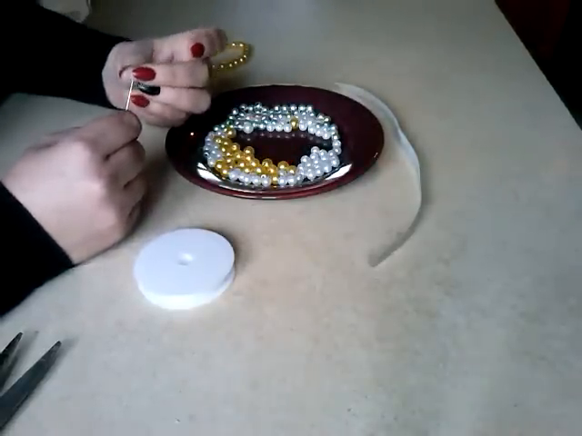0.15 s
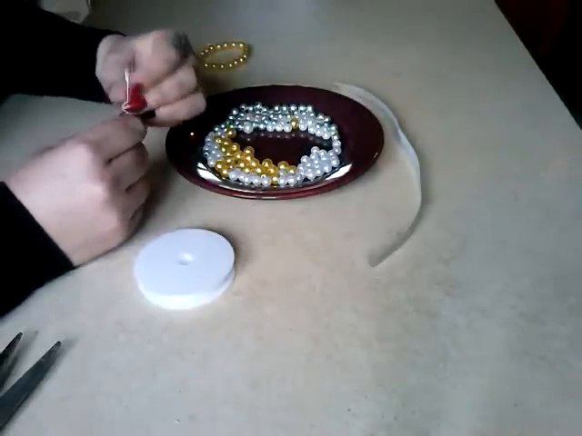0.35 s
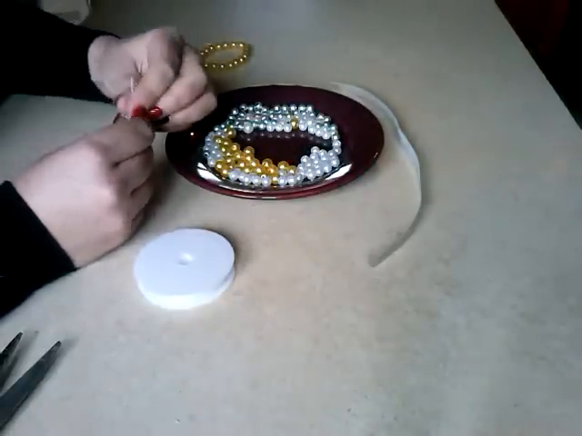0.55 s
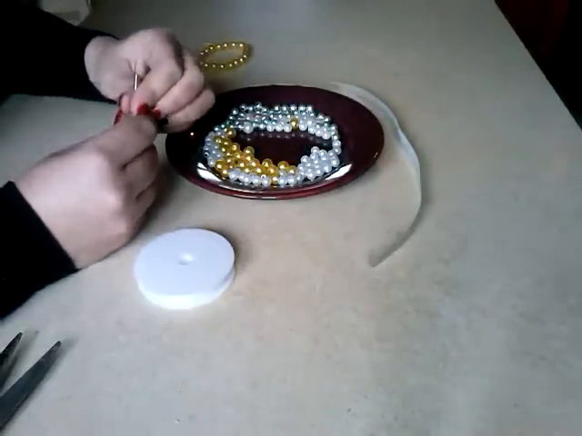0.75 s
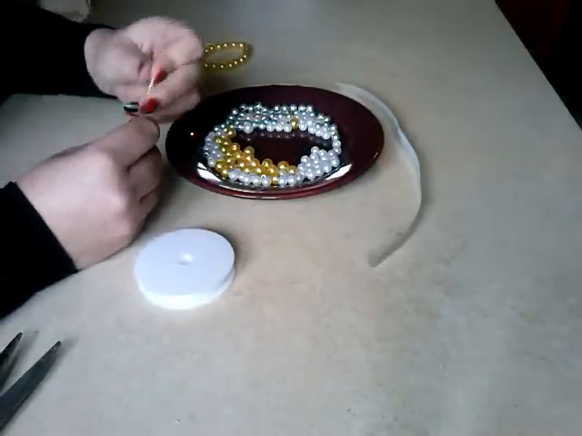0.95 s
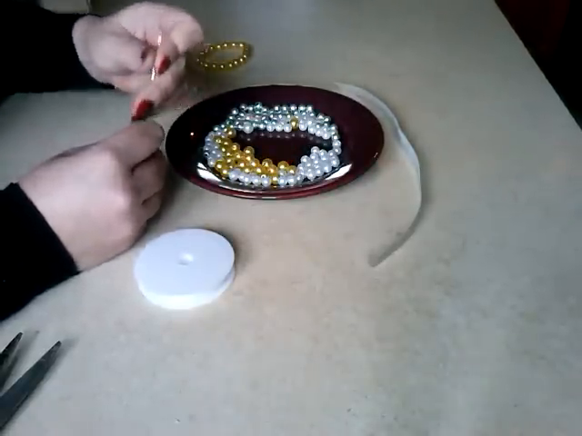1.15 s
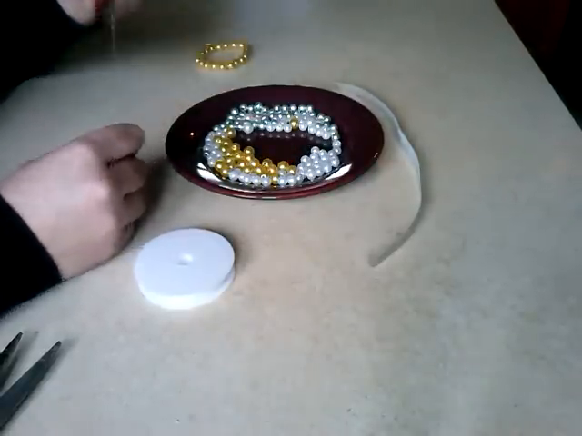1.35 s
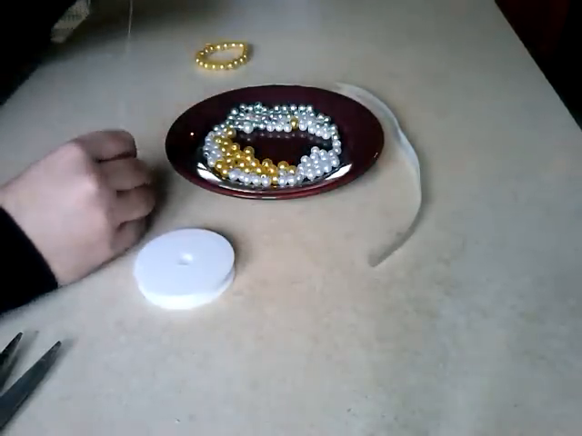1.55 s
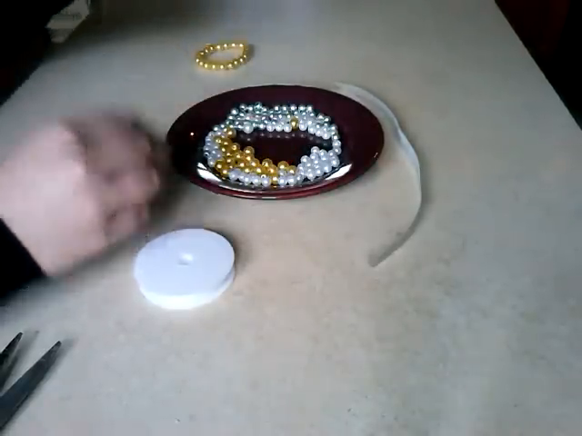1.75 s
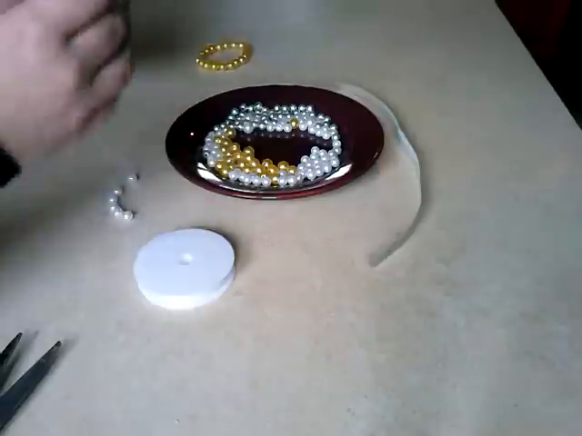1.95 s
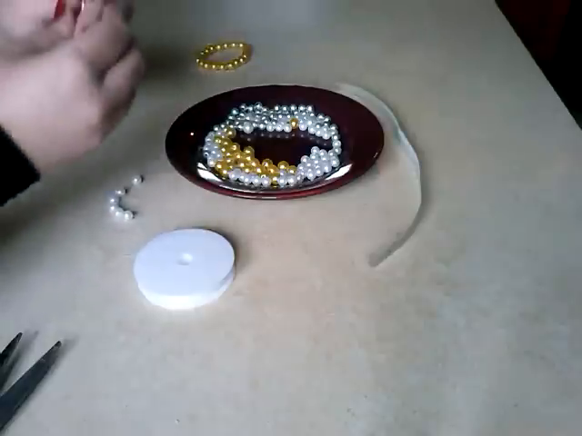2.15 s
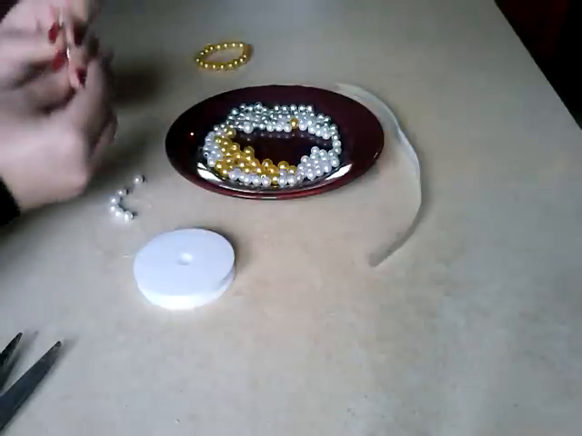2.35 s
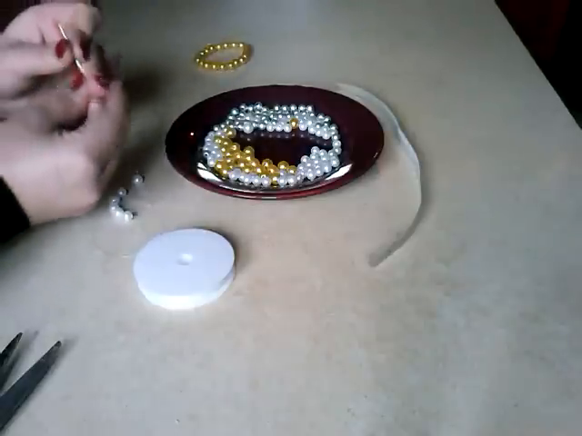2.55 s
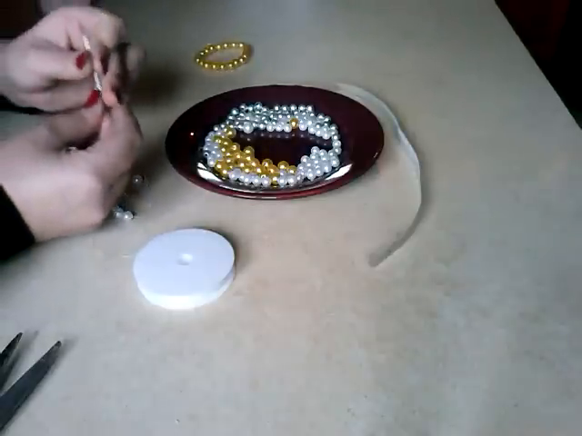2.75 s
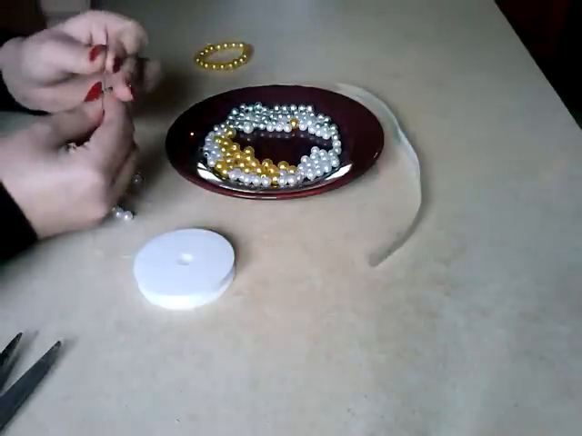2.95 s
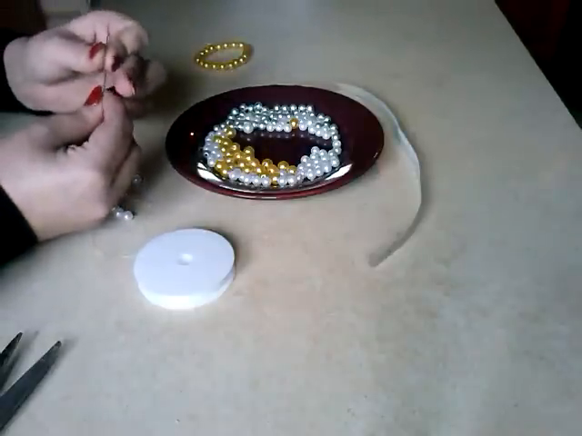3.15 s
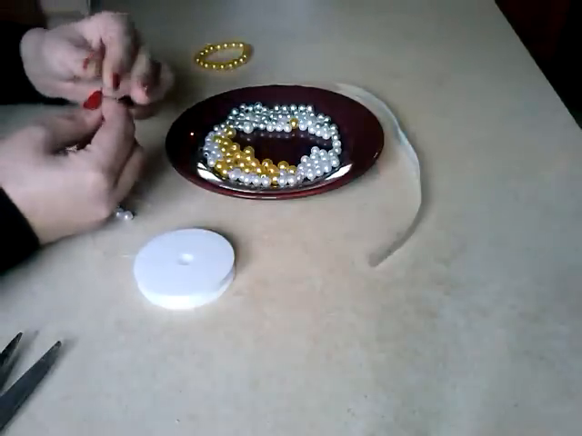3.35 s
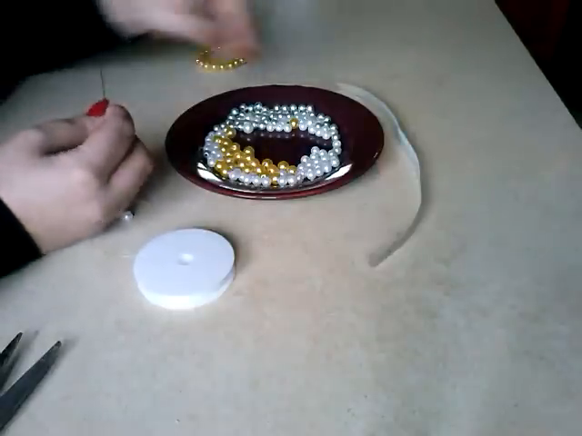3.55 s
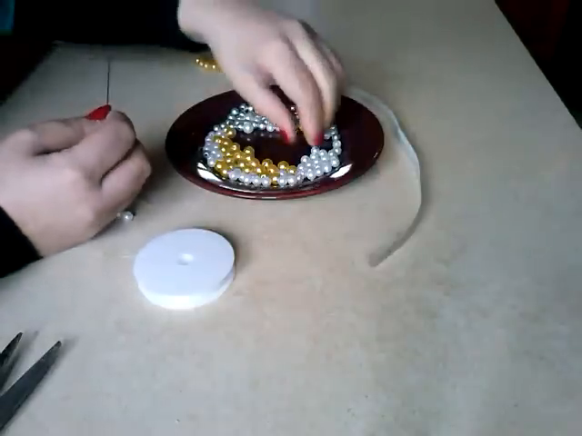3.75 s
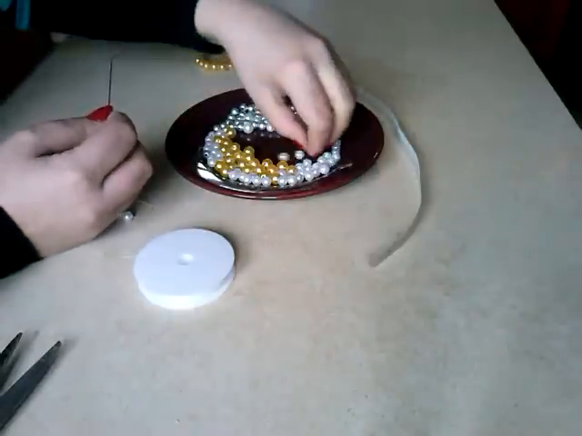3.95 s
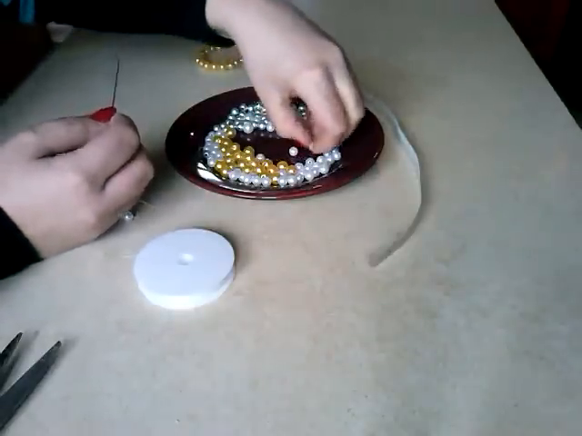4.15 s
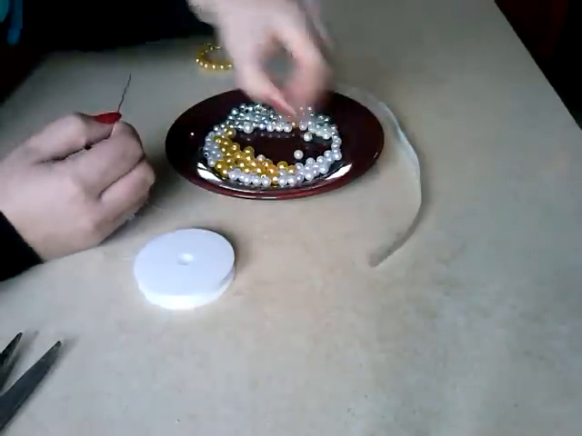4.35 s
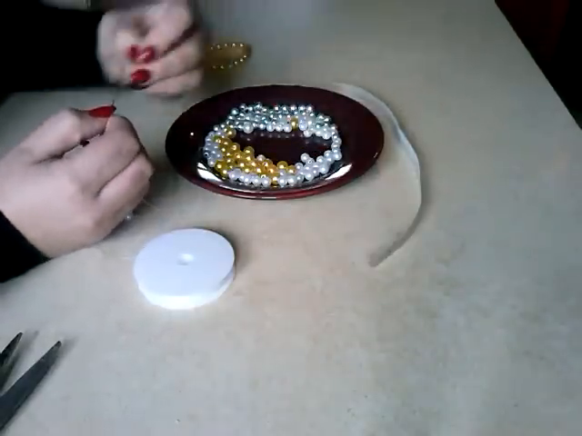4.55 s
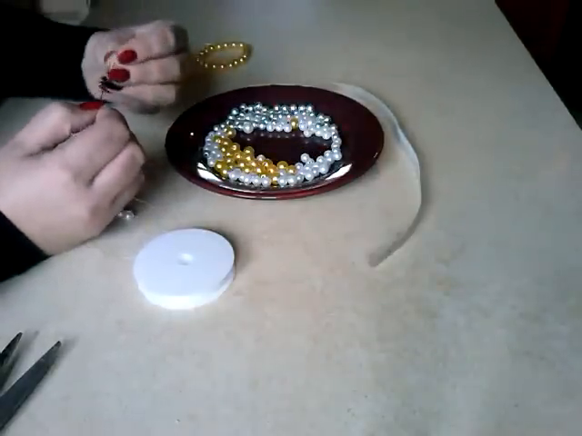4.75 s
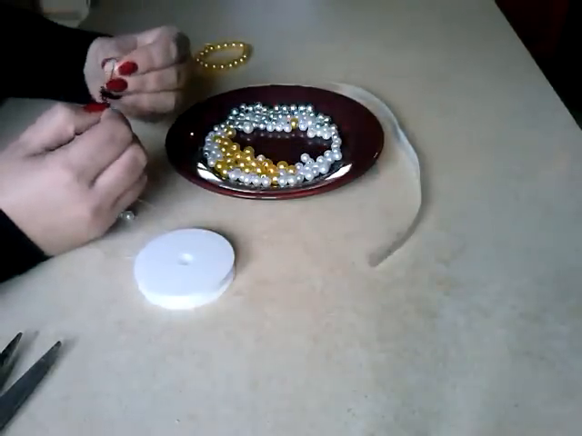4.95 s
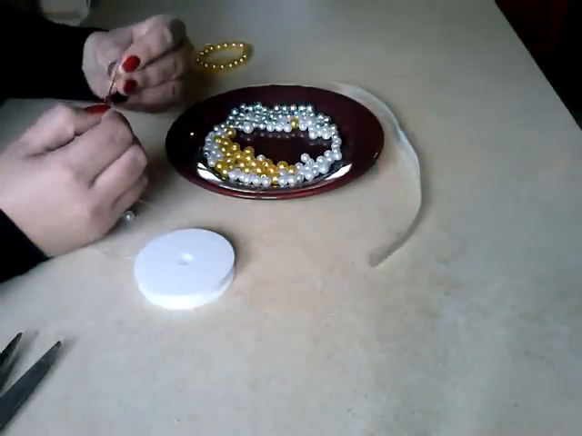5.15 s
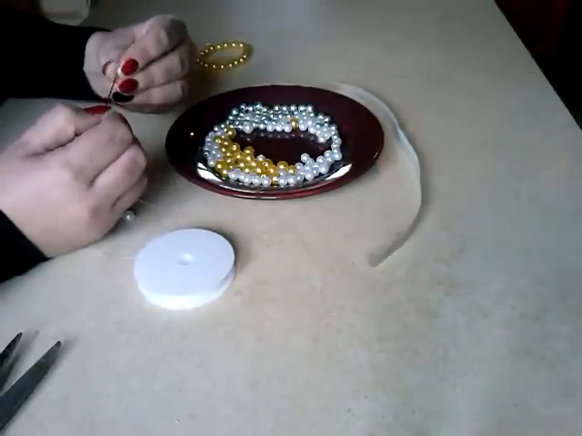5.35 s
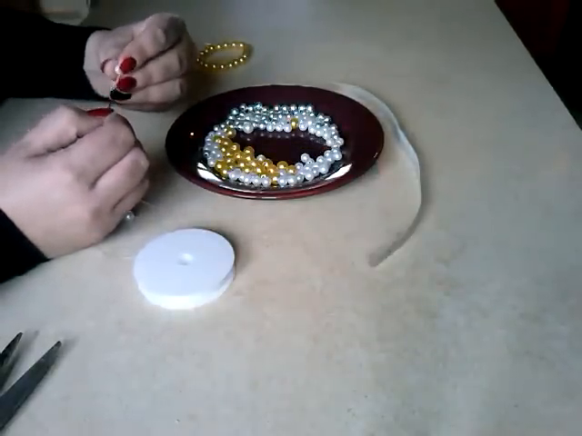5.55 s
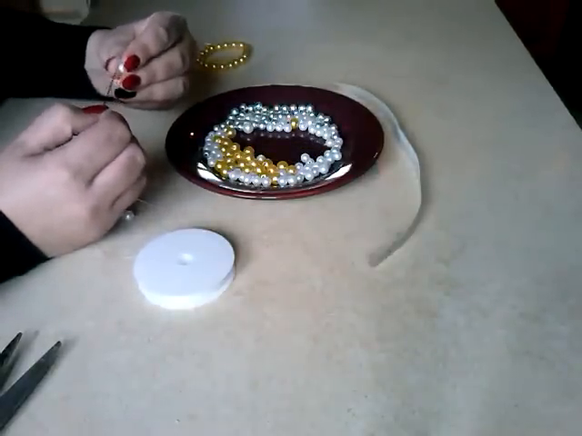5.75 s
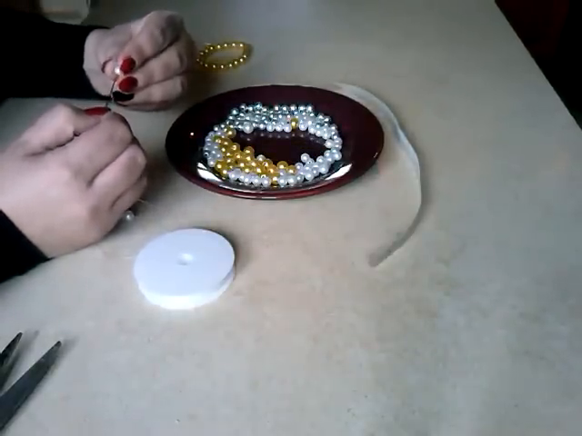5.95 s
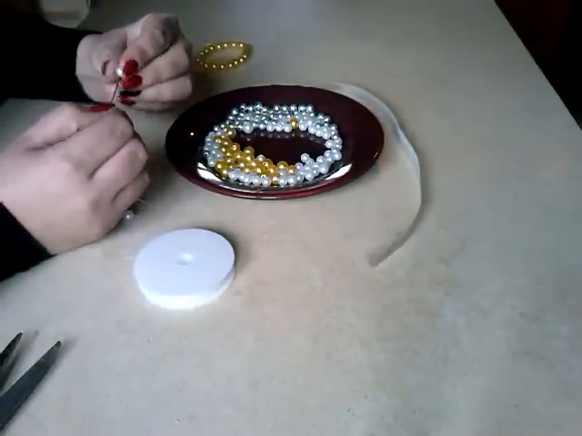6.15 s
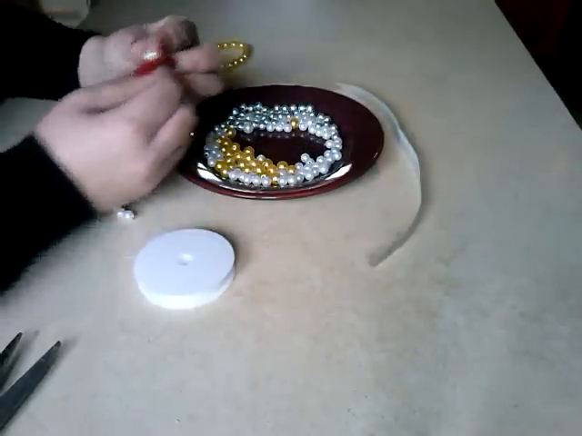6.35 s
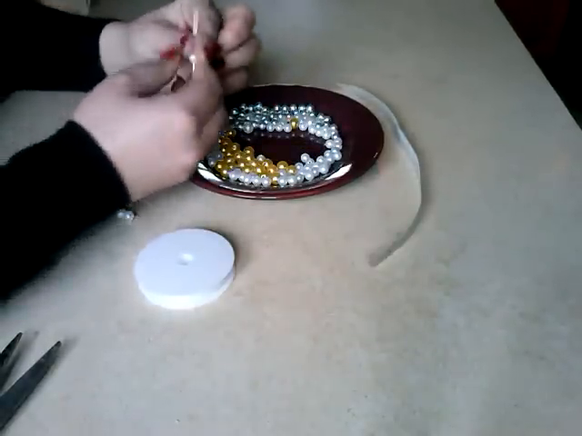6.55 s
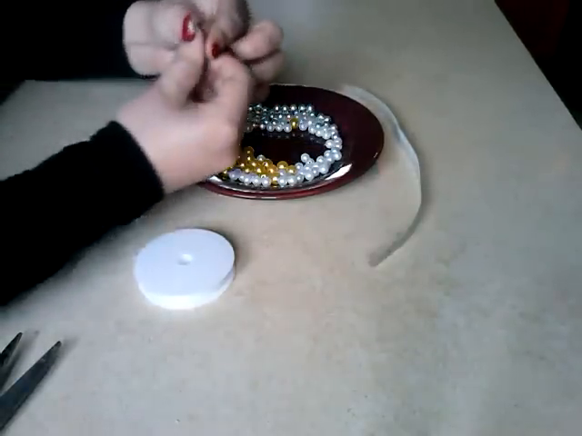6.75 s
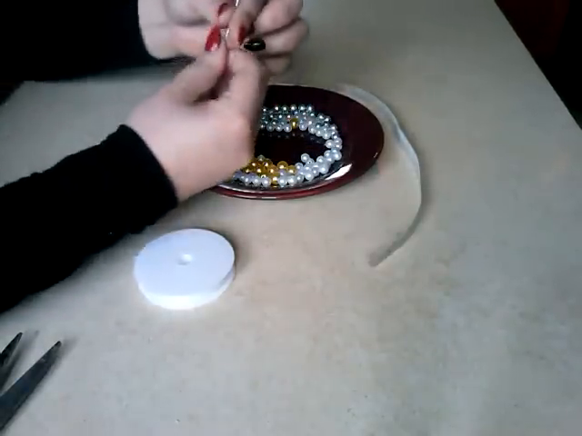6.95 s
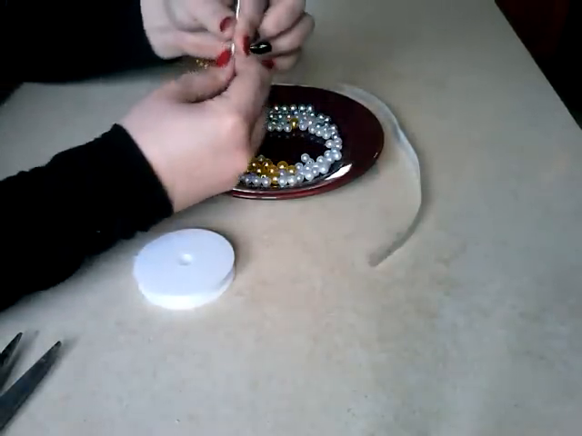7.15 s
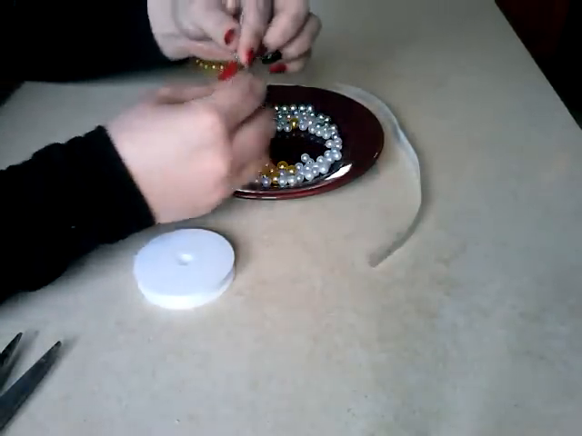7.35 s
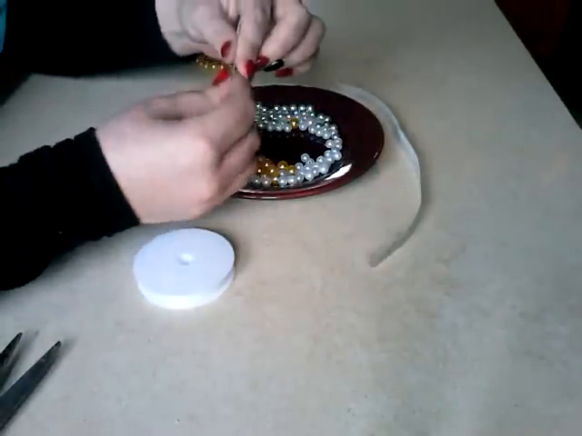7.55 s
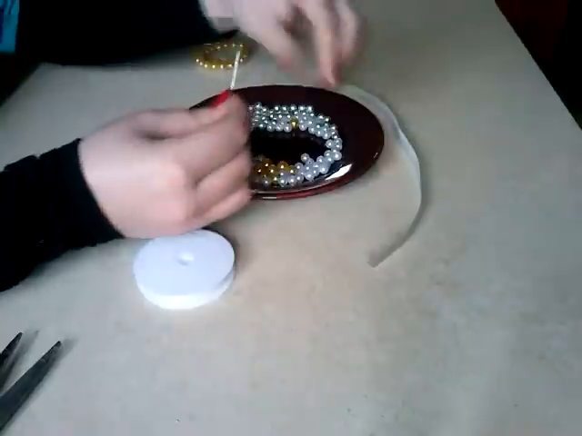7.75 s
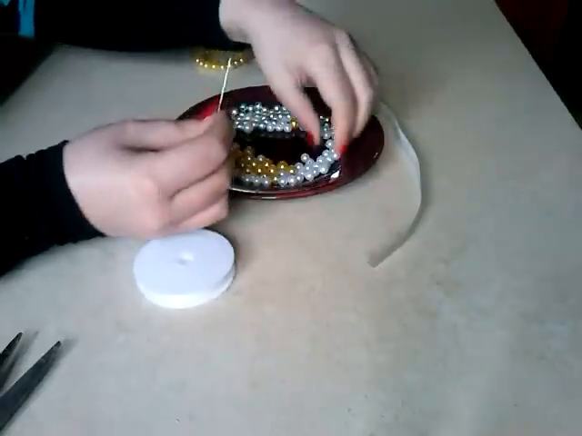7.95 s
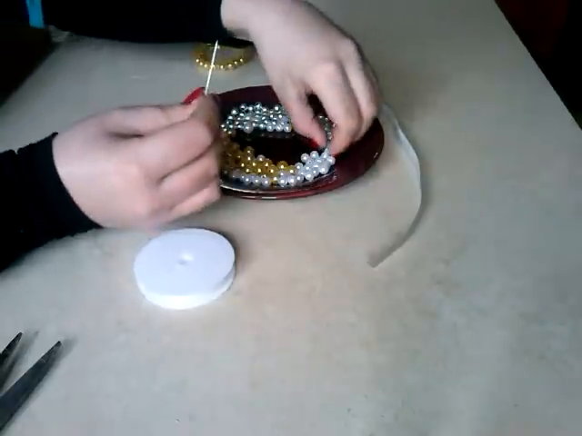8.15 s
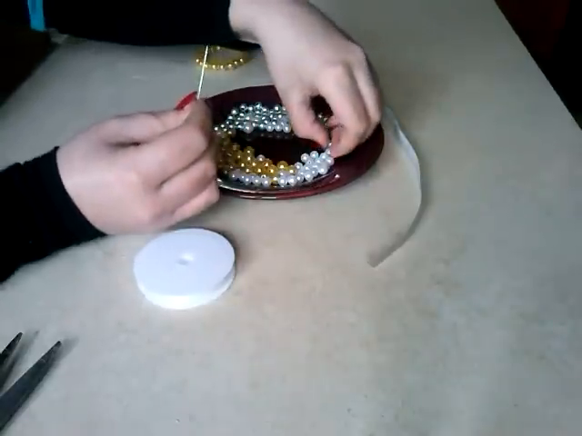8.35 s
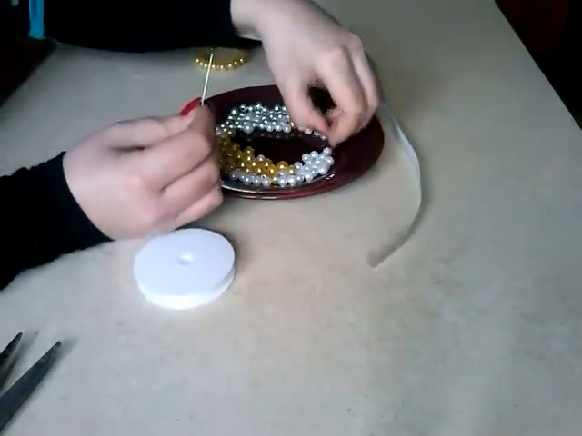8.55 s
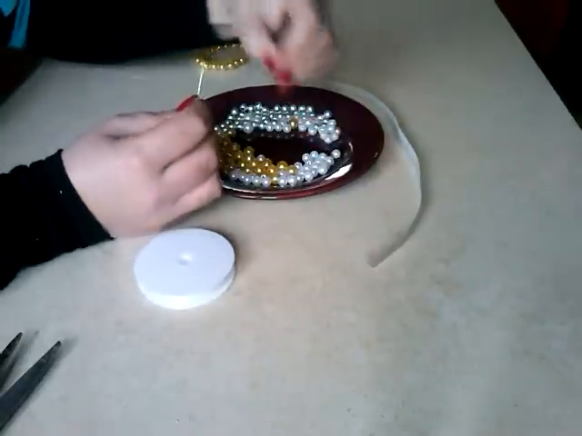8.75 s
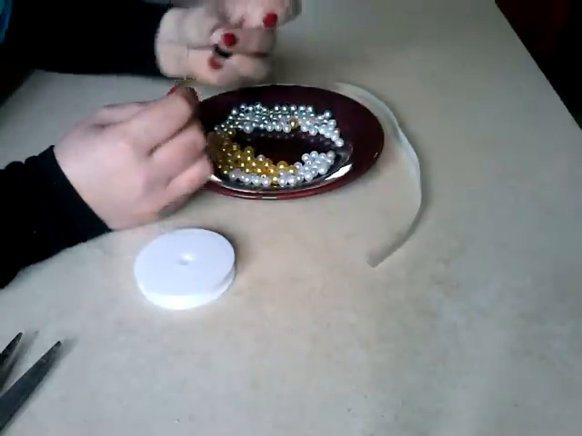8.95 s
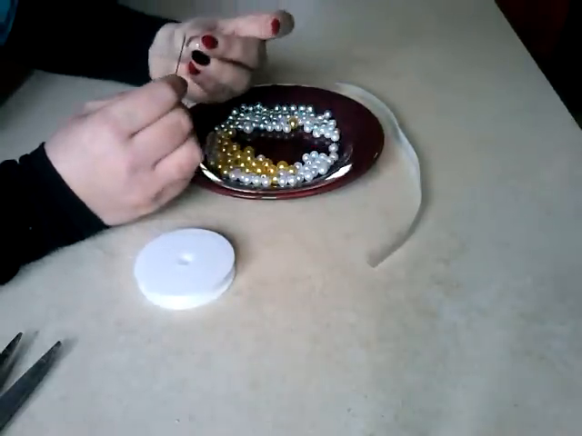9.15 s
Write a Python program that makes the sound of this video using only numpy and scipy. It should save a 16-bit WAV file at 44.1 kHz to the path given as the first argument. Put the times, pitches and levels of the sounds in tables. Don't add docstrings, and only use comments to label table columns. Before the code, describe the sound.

Tiny hard beads handled at a table, picked up by a close, slightly hissy microphone in a reflective room. Distant ticking runs throughout. First come sharp clicks and a grainy string drag, then gentle rattling as beads are pushed in a plate with short ceramic ringing. Later a loud clink on the plate rim breaks the calm, with smaller rebounds, then sharp table bounces growing closer and softer, knuckle knocks and faint rattling.

```python
import sys
import numpy as np
from scipy import signal
from scipy.fft import rfft, irfft, next_fast_len
from scipy.io import wavfile

SR = 44100
rng = np.random.default_rng(int(sys.argv[2]) if len(sys.argv) > 2 else 0)


def transcribe(signal):
    frames = np.atleast_2d(signal).T
    limited = np.clip(frames, -1, 1)
    pcm = np.round(limited * 32767).astype(np.int16)
    wavfile.write(sys.argv[1], SR, pcm)


def voltage_ratio(level):
    return 10 ** (np.asarray(level, float) / 20)


N = 406161

# f/Hz, density/dB per Hz
HISS = [(71, -49.5), (120, -10.5), (166, -11), (192, -8), (294, -5.5), (407, -9), (433, -23), (470, -9.5),
        (1100, -9.5), (1300, -14), (15600, -13.5)]
HISS_DB, RUMBLE_DB = -61, -76.5
# f/Hz, level/dB rms
HUM = [(48.4, -72), (96.9, -72.5), (209.9, -83.5), (441.4, -79), (1082, -86), (1771, -87), (2579, -85.5)]

# t after the tick/s, level/dB
TICK_PARTS = [
    (-.025, -1.5),
    (-.006, -1.5),
    (.008, -5),
    (.03, -20.5),
    (0.057, -8),
]
TICK_EXTRA_DB = [-4, -2.7, 2.5, 0, 2, -1, -2.5, -4, -13, -3.3]
# f/Hz, width/Hz (unused), level/dB
CLOCK_CASE = [(1360, 29, -7), (2740, 9.3, -6), (3920, 14, -2), (5070, 140, -3.5), (5830, 15, -6),
              (7100, 33, -14), (10800, 96, -3)]
FIRST_TICK_S, TICK_DB = 0.019, -53.5

# f/Hz, width/Hz, level/dB
TABLE_MODES = [(828, 54, -0.5), (1026, 34, -3.5), (1300, 27, -14.5), (1800, 66, 4.5), (2530, 120, 6)]
# t/s, peak/dB, ping/Hz
TAPS = [(1.4066, -15, 11800), (1.7499, -22.5, 11600), (1.7577, -20, 11400), (1.7627, -18, 11800),
        (1.4166, -24, 12200), (1.591, -33, 10900), (1.7601, -26, 12000), (1.7677, -24, 12500),
        (1.7728, -22, 12000), (6.3138, -42, 12100), (7.496, -37, 10800), (9.0724, -42, 9600)]
# t/s, peak/dB, ping/Hz
BOUNCES = [
    (7.9969, -13.5, 11200),
    (8.112, -18.5, 10800),
    (8.1771, -18, 11900),
    (8.1885, -21.5, 9700),
    (8.2323, -21.5, 12000),
    (8.2734, -23, 12100),
    (8.304, -29, 10800),
    (8.3332, -30.5, 12000),
    (8.355, -34, 11900),
]
# t/s, peak/dB, ping/Hz
TINKS = [(0.8648, -47, 11900), (0.8867, -41, 12700), (1.1767, -46, 10500), (1.215, -44, 13100),
         (1.34, -33, 12300), (1.8134, -35, 11600), (1.8422, -65, 10300), (2.406, -37.5, 10800),
         (4.1764, -45, 12300), (7.964, -26, 13900), (8.065, -33, 11600)]
# t/s, peak/dB, ping/Hz
TOCKS = [
    (1.5438, -49, 6400),
    (1.6594, -36.5, 5500),
    (1.885, -28, 6670),
    (2.3181, -38, 6260),
    (2.393, -40, 7300),
    (2.603, -40.5, 6000),
    (7.0765, -43.5, 5630),
    (8.3746, -35, 6870),
]
# body/dB, table knock/dB
CLICK_KINDS = [
    (-1.5, -28.5),
    (-3.5, -30.5),
    (-8.5, -38),
    (0, -24.5),
]
PING_PEAK_CYCLES = 0.8
# t/s, length/s, level/dB, sag/dB per s
DRAGS = [
    (1.01, 0.018, -63, 5),
    (1.176, .15, -68, 3),
    (1.53, 0.066, -47, 121),
    (1.664, 0.006, -51, 100),
    (1.78, 0.2, -43.5, 37),
    (8.19, 0.24, -50.5, 57),
    (2.6, 0.0067, -60, 5),
    (6.31, 0.13, -60.5, 100),
    (6.6, 0.42, -64, 44),
]
# f/Hz, density/dB per Hz
DRAG_COLOUR = [(300, 3), (1040, 3), (2000, 2), (5000, -3.5), (11000, -1), (16000, -16)]
DRAG_KNOCK_DB = -25.5
# delay/s, share
MIRROR = [(.00032, -.6), (.00067, .4), (.00115, -.3)]

# t/s, length/s, level/dB, sag/dB per s
THUDS = [
    (1.77, 0.24, -65, 83),
    (3.89, .2, -50, 90),
    (7.95, 0.17, -58, 82),
    (8.19, 0.016, -64, 50),
]
# t/s, length/s, level/dB, sag/dB per s
RUMBLES = [
    (1.75, .25, -64, 82),
    (3.826, .42, -53, 33),
    (4.3, .03, -65, 370),
    (4.34, 0.26, -60, 8.1),
    (8.0, 0.22, -49.5, 96),
    (8.24, .2, -59.5, 79),
    (8.5, 0.34, -59, 80),
]
# t/s, peak/dB, f/Hz
BUMPS = [
    (2.268, -54, 342),
    (2.502, -44, 470),
    (3.373, -54, 433),
    (7.934, -35, 976),
    (8.02, -35.5, 984),
    (8.604, -45, 970),
    (8.925, -54, 310),
]
# t/s, peak/dB, rise/s
PUSH = (7.5748, -17, 0.00028)
RISE_DB_PER_S, RELEASE_DB_PER_S = 590, 318

# t/s, length/s, level/dB, sag/dB per s
SCUFFS = [
    (2.265, 0.008, -68.5, 53),
    (4.61, 0.051, -62, 27),
    (6.54, 0.047, -62.5, 24),
]
SCUFF_HZ, SCUFF_WIDTH_HZ = 1770, 510

# rim/dB, well/dB, under the fingers/dB, far side/dB
PLATE_DB = [(-15, -21, -8.5, -13), (-20.5, -7, -17, -30.5), (-19.5, -22, -11, -28), (-25, -26, -4, -45),
            (-24, -9.5, 1.5, -15), (-6, -15.5, -5, -24), (-14.5, -12, -0.5, -10), (-32.5, -7, 5, -7),
            (-4.5, -4.5, -20, -14), (-15.5, -1, 0.5, -13), (-10.5, -23, -51, -12), (-15, -13, 1, -4),
            (-16.5, -1, 0, -22), (-17, -2.5, -11, -1.5), (-10.5, -22, -2, -17), (-33, -1, -25, -19),
            (-13.5, -28, 6, 1.5), (-41, -30, -14, -22), (-5, 1, -7, -17), (-28.5, -24, 1, -2),
            (-19.5, -2, 5, -31), (-41, -10, -5, -22), (-11.5, -21, 1, -10), (-24, -2, 3, -16),
            (-1, -41, -21, -20), (-15, -33, -15, -32), (-34, -3, -9, -38), (-10, -11, 2, -8),
            (-36, -17, -39, -31), (-12.5, 2, -38, -42)]
PLATE_HZ = [1735, 2260, 2822, 3420, 3590, 4066, 4885, 5440, 5522, 6422, 7082, 7890, 8525, 8710, 8803]
PLATE_HZ_TOP = [9890, 10000, 10470, 10640, 10780, 11150, 11640, 11849, 12030, 12570, 12645, 13630, 13790,
                14420, 14765]
DAMPING = [0.51, 0.31, 0.47, 0.32]
FOOT_DB = [-28, -28, -15, -18.5]
# f/Hz, level/dB, t60/s
FOOT_ROCK = [(656, -31.5, 0.096), (866, -35, 0.18), (980, -28, 0.041)]
# t/s, peak/dB
RIM_BLOWS = [
    (7.5745, 0),
    (7.6916, -13),
    (7.7502, -20.5),
    (7.7734, -18),
    (7.7912, -26),
    (7.8081, -29),
    (7.8494, -44),
]
# t/s, peak/dB
WELL_BLOWS = [
    (4.2987, -23.5),
    (4.337, -24.5),
    (4.3721, -25.5),
    (4.4071, -26.5),
    (4.449, -37),
    (4.4894, -33.5),
    (4.5085, -34),
]
# t/s, peak/dB
FINGER_BLOWS = [
    (3.8303, -47),
    (3.8596, -40),
    (3.8885, -50),
    (3.9656, -46.5),
    (4.0908, -51),
]
# t/s, peak/dB
FAR_BLOWS = [
    (8.3964, -34),
    (8.5036, -45),
    (8.517, -30),
]
# t/s, length/s, rattle/dB, sag/dB per s
STIRS = [
    (3.87, 0.12, -42.5, 141),
    (4.07, 0.12, -52, 6),
    (4.42, 0.3, -45, 79),
    (8.41, 0.46, -46.5, 93),
]
# t/s, peak/dB, f/Hz, t60/s
PINGS = [
    (5.005, -62, 12950, .1),
    (5.055, -64, 12950, .1),
    (5.336, -66, 5522, 0.098),
    (5.494, -53, 5550, 0.062),
    (5.5, -62, 8525, 0.06),
    (6.681, -66, 6800, 0.07),
    (8.839, -63, 5522, 0.079),
]
RING_S, RING_TOP_S, TOP_FROM_HZ = 0.1, 0.08, 9300
HARD_DB, BRIGHT_DB_PER_DB = -3, 0.1826

# delay/s, level/dB
ECHOES = [(.0048, -18), (.0119, -13), (.0186, -14)]
# f/Hz, t60/s
ROOM_T60 = [(200, 0.36), (1000, 0.74), (2500, 0.34), (5000, 0.41), (9000, 0.36), (15000, 0.22)]
CEILING_S, CEILING_DB = 0.0102, -4
SCATTER_S, SCATTER_DB = 0.003, -14
ROOM_RISE_S, ROOM_DB, ROOM_BASS_CUT_HZ = 0.010, 4, 4570
OVERLOAD, EDGE_HZ, OFFSET = 1.4, 15950, 0.0018


def evened(x):
    return x / np.sqrt(np.mean(x ** 2) + 1e-20)


def read(points, hz):
    f, value = np.transpose(points)
    return np.interp(np.log(hz + 1), np.log(f + 1), value)


def add(mix, s, sound):
    part = mix[round(s * SR):][:len(sound)]
    part += sound[:len(part)]


def stroke_gain(strokes):
    t, gain = np.arange(0, N, 50) / SR, 0
    for s, length, db, sag_db_per_s in strokes:
        u = t - s
        rise_db = RISE_DB_PER_S * np.minimum(u, 0)
        sag_db = sag_db_per_s * np.clip(u, 0, length)
        release_db = RELEASE_DB_PER_S * np.maximum(u - length, 0)
        gain = gain + voltage_ratio(db + rise_db - sag_db - release_db)
    return np.interp(np.arange(N) / SR, t, gain)


def coloured(x, points):
    size = next_fast_len(len(x))
    gain = voltage_ratio(read(points, np.fft.rfftfreq(size, 1 / SR)))
    return evened(irfft(rfft(x, size) * gain, size)[:len(x)])


def ring(x, hz, width_hz):
    r, turn = np.exp(-np.pi * width_hz / SR), 2 * np.pi * hz / SR
    return signal.lfilter([0, np.sin(turn)], [1, -2 * r * np.cos(turn), r * r], x)


def grains(per_s, spread_db):
    size = voltage_ratio(spread_db * np.minimum(rng.exponential(1, N), 4))
    size = size * rng.choice([-1., 1.], N)
    return evened(size * (rng.random(N) < per_s / SR))


def background():
    t = np.arange(N) / SR
    out = voltage_ratio(HISS_DB) * coloured(rng.standard_normal(N), HISS)
    out += voltage_ratio(RUMBLE_DB) * evened(ring(rng.standard_normal(N), 87, 90))
    for hz, db in HUM:
        steady = np.sqrt(2) * np.sin(2 * np.pi * hz * t)
        waver = evened(ring(rng.standard_normal(N), hz, 0.99 + 0.043 * hz))
        out += voltage_ratio(db) * (steady + min(hz / 500, 1) * waver)
    return out


def clock():
    drive, t = np.zeros(N), np.arange(900) / SR
    for second in range(10):
        for s, db in TICK_PARTS:
            shake = rng.standard_normal(900) * t / 0.0027 * np.exp(-t / 0.0031)
            start_s = max(FIRST_TICK_S + second + s, 0)
            add(drive, start_s, voltage_ratio(db + TICK_EXTRA_DB[second]) * shake)
    case = np.zeros(N)
    for hz, _, db in CLOCK_CASE:
        width_hz = 0.12 * hz
        case += voltage_ratio(db) * ring(drive, hz, width_hz) * np.sqrt(width_hz / 3000)
    return voltage_ratio(TICK_DB) * (case + 1.3 * drive)


def click(peak_db, hz, body_db, knock_db):
    t = np.arange(900) / SR
    u = t * hz / PING_PEAK_CYCLES
    ping = np.sin(2 * np.pi * hz * t) * u * np.exp(1 - u)
    body = np.sin(2 * np.pi * 4500 * t) * np.exp(-t / 0.00007)
    body = signal.lfilter(*signal.butter(2, 900, "high", fs=SR), body)
    knock = np.zeros(900)
    for f, width_hz, db in TABLE_MODES:
        knock += voltage_ratio(db) * np.sin(2 * np.pi * f * t) * np.exp(-np.pi * width_hz * t)
    return voltage_ratio(peak_db - 0.5) * (ping - voltage_ratio(body_db + 5.5) * body + voltage_ratio(knock_db) * knock)


def beads():
    patter, drag = grains(1000, 3.6), stroke_gain(DRAGS)
    out = voltage_ratio(-4.5) * drag * coloured(patter, DRAG_COLOUR)
    top = sum(voltage_ratio(db) * ring(patter, hz, width_hz) for hz, width_hz, db in TABLE_MODES)
    out += voltage_ratio(DRAG_KNOCK_DB) * drag * evened(top)
    for rows, kind in zip([TAPS, BOUNCES, TINKS, TOCKS], CLICK_KINDS):
        for s, peak_db, hz in rows:
            add(out, s, click(peak_db, hz, *kind))
    return out


def hands():
    thud = ring(ring(rng.standard_normal(N), 136, 42), 136, 42)
    out = stroke_gain(THUDS) * evened(thud)
    out += stroke_gain(RUMBLES) * evened(ring(grains(120, 1.0), 467, 180))
    t = np.arange(900) / SR
    for s, peak_db, hz in BUMPS:
        add(out, s, voltage_ratio(peak_db) * np.sin(2 * np.pi * hz * t) * np.exp(-t / 0.0044))
    push_s, push_db, rise_s = PUSH
    add(out, push_s, voltage_ratio(push_db) * t / rise_s * np.exp(1 - t / rise_s))
    return out


def cuff():
    rub = ring(grains(2800, 3.5), SCUFF_HZ, SCUFF_WIDTH_HZ)
    return stroke_gain(SCUFFS) * evened(ring(rub, SCUFF_HZ, 2 * SCUFF_WIDTH_HZ))


def chime(place, bright_db):
    t = np.arange(9000) / SR
    hz = np.array(PLATE_HZ + PLATE_HZ_TOP)
    spot_db = 2.5 * rng.standard_normal(len(hz))
    sign = np.sign(rng.standard_normal(len(hz)))
    db = np.array(PLATE_DB)[:, place] + bright_db * np.log2(hz / 8000) + spot_db
    held = np.minimum(hz / 3600, 1)
    t60_s = np.where(hz < TOP_FROM_HZ, RING_S, RING_TOP_S) * held * DAMPING[place]
    modes = voltage_ratio(db - 60 * t[:, None] / t60_s) * np.sin(2 * np.pi * hz * t[:, None])
    swell = 1 - np.exp(-t / 0.0006)
    rock = np.zeros(9000)
    for f, foot_db, foot_t60_s in FOOT_ROCK:
        rock += voltage_ratio(foot_db - 60 * t / foot_t60_s) * np.sin(2 * np.pi * f * t)
    return modes @ sign * swell + rock


def plate():
    out, stir = np.zeros(N), stroke_gain(STIRS)
    for place, blows in enumerate([RIM_BLOWS, WELL_BLOWS, FINGER_BLOWS, FAR_BLOWS]):
        for s, peak_db in blows:
            bright_db = BRIGHT_DB_PER_DB * (peak_db - HARD_DB)
            add(out, s, voltage_ratio(peak_db - 11.5) * chime(place, bright_db))
            add(out, s, click(peak_db - 5, 12500, -2.2, FOOT_DB[place]))
    for place in (1, 2, 3):
        patter = stir * grains(150, 2.3)
        out += voltage_ratio(-37.5) * signal.oaconvolve(patter, chime(place, 0))[:N]
    t = np.arange(9000) / SR
    for s, peak_db, hz, t60_s in PINGS:
        add(out, s, voltage_ratio(peak_db - 60 * t / t60_s) * np.sin(2 * np.pi * hz * t))
    bead_on_bead = coloured(grains(1500, 0.87), DRAG_COLOUR)
    return out + voltage_ratio(-11.5) * stir * bead_on_bead


def room(x):
    t = np.arange(1500) / SR
    early = voltage_ratio(SCATTER_DB) * rng.standard_normal(1500) * np.exp(-t / SCATTER_S)
    for s, db in ECHOES:
        early[round(s * SR)] = voltage_ratio(db)
    early[round(CEILING_S * SR)] = voltage_ratio(CEILING_DB)
    bright = signal.lfilter(*signal.butter(1, 6000, "high", fs=SR), x)
    out = x + signal.oaconvolve(bright, early)[:N]
    for k in range(3):
        hz, t, z = signal.stft(rng.standard_normal(SR), SR, nperseg=256)
        decay = voltage_ratio(-60 * t / read(ROOM_T60, hz)[:, None])
        tail = signal.istft(z * decay, SR, nperseg=256)[1]
        tail = signal.lfilter(*signal.butter(1, ROOM_BASS_CUT_HZ, "high", fs=SR), tail)
        tail *= 1 - np.exp(-(np.arange(len(tail)) / SR / ROOM_RISE_S) ** 2)
        share = np.sqrt(2 / 3) * np.cos(2 * np.pi * (1.3 * np.arange(N) / SR + k / 3))
        out += voltage_ratio(ROOM_DB) * signal.oaconvolve(x * share, tail / np.linalg.norm(tail))[:N]
    return out


def scene():
    low, ringing, loose = hands(), plate(), beads()
    airborne = ringing + loose + clock() + cuff() + 0.66 * low
    out = room(airborne) + 0.083 * low + background()
    for s, share in MIRROR:
        add(out, s, share * loose)
    return out[None]


def band_limit(x):
    return signal.sosfilt(signal.butter(12, 17070, fs=SR, output="sos"), x)


def record(dry):
    rounded = OVERLOAD * np.tanh(dry / OVERLOAD)
    limited = signal.oaconvolve(rounded, signal.firwin(255, EDGE_HZ, fs=SR)[None], "same")
    return band_limit(limited + OFFSET)


dry = scene()
out = record(dry)
transcribe(out)
```